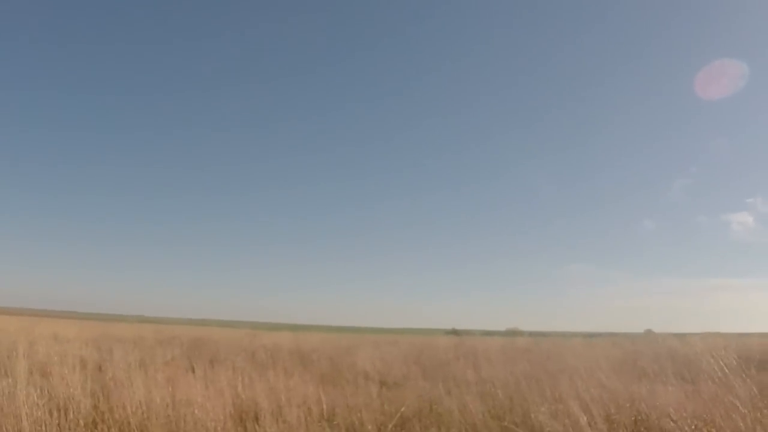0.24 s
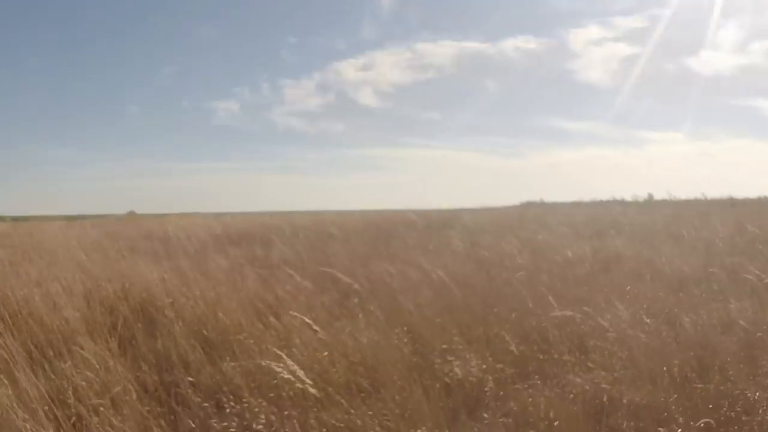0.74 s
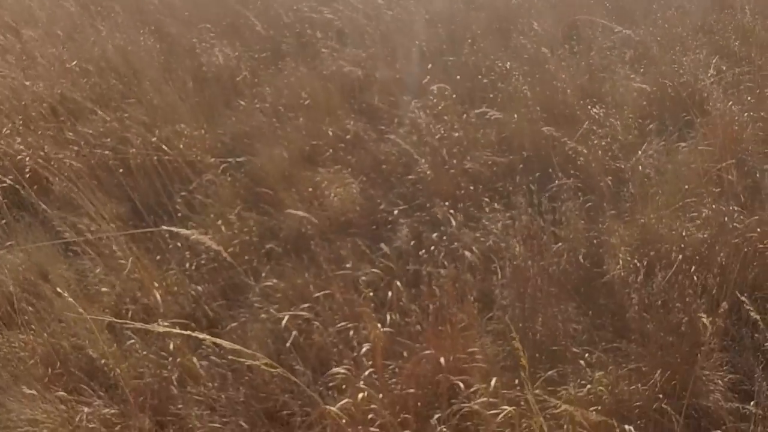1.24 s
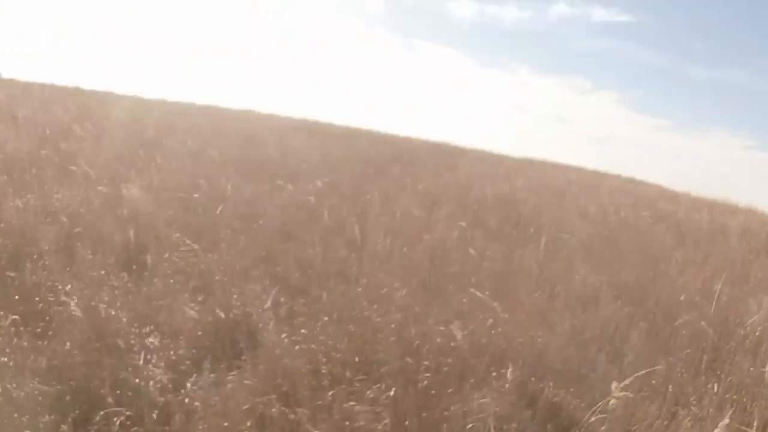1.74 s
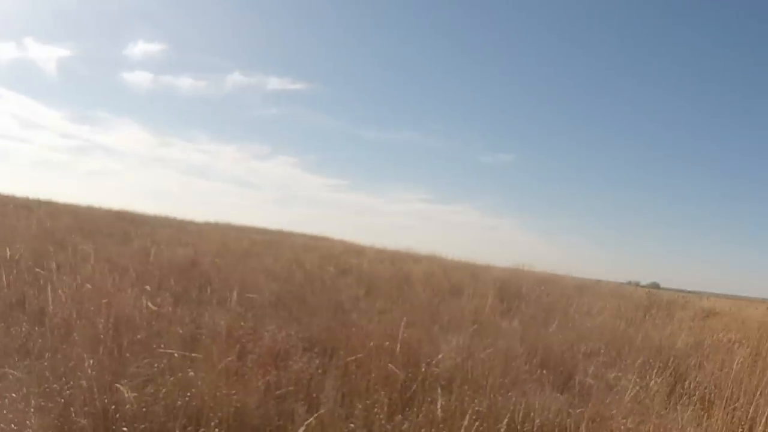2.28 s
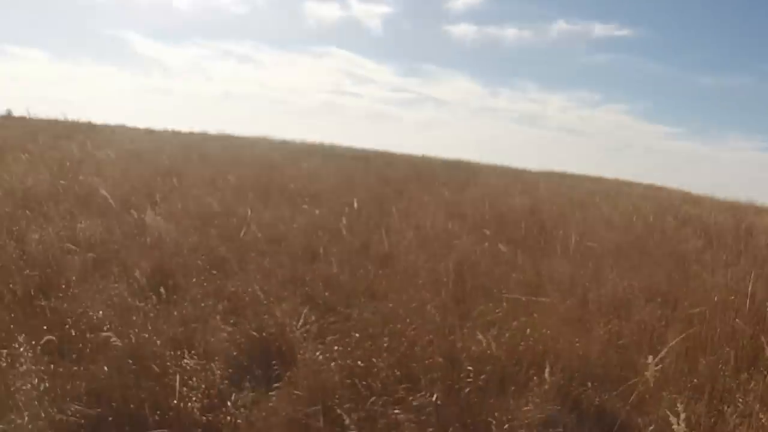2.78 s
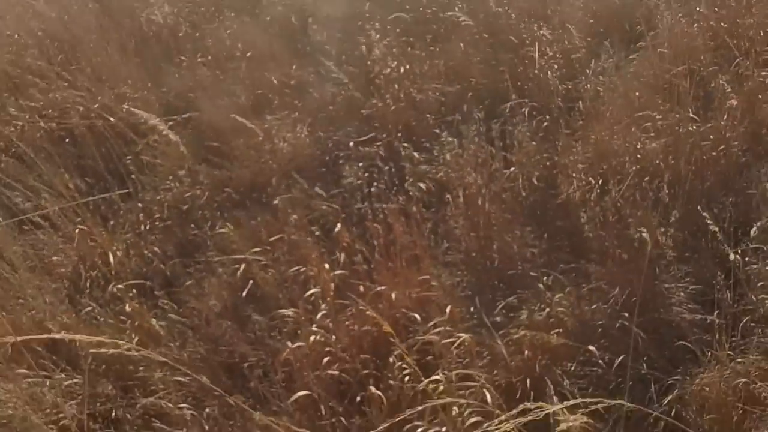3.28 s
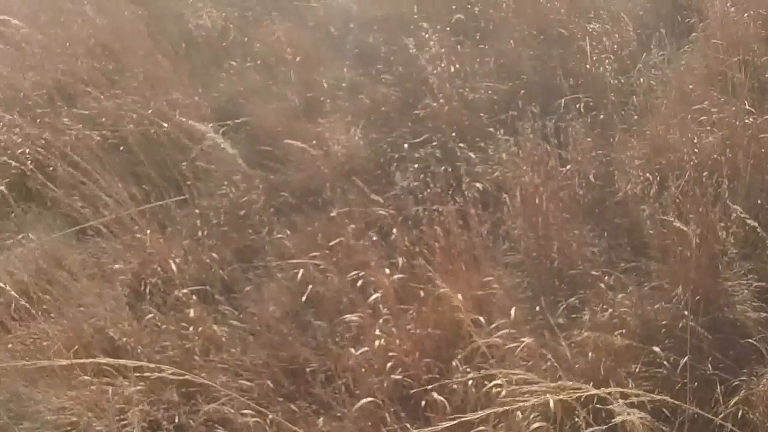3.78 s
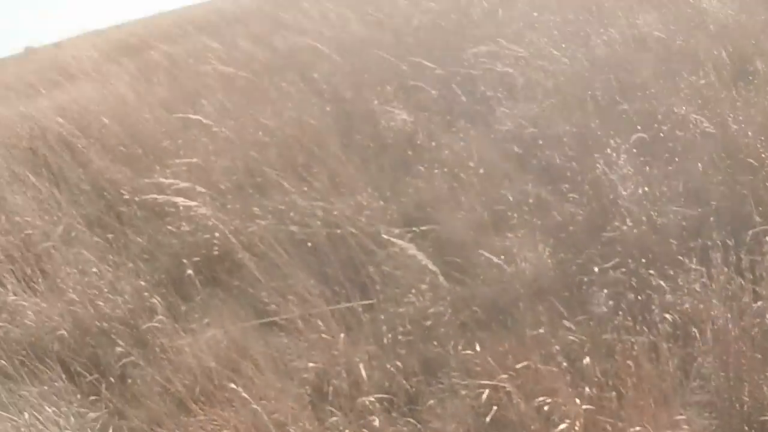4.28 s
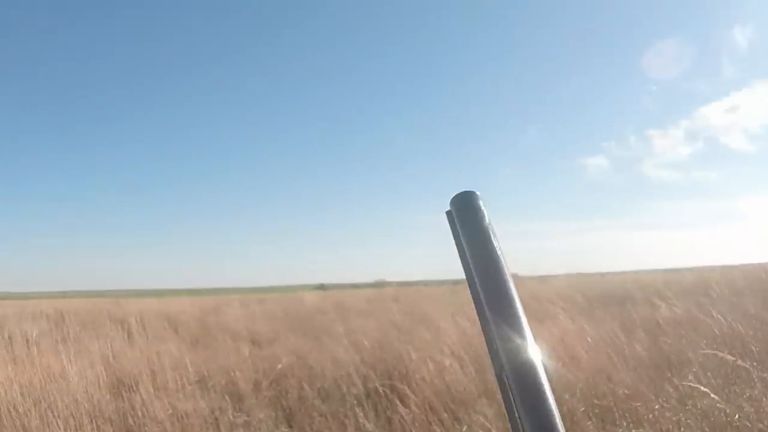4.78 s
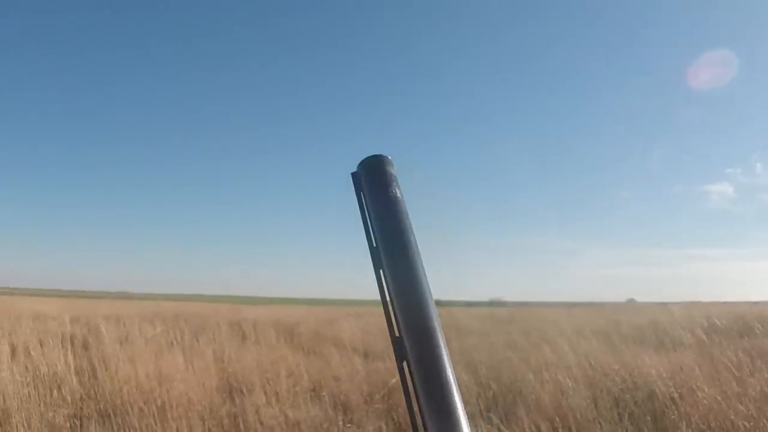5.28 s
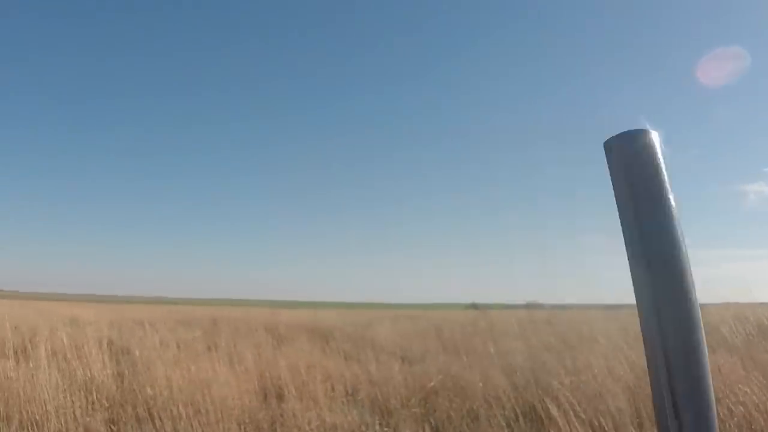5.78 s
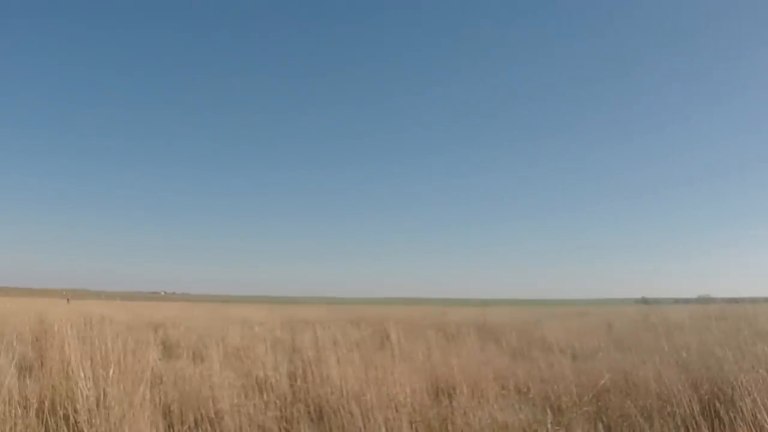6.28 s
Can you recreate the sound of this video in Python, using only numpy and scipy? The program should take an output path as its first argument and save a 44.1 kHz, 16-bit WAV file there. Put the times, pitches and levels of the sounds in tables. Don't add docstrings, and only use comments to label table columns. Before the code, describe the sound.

Someone shifts through tall dry grass carrying a barrel. Gusts rumble on the microphone port, stalks swish and crunch, and cloth drags hollowly on the housing. A loose metal swivel ticks and chirps as the barrel is lowered, falls nearly quiet, then rattles and knocks as it rises. Strong wind buffets follow, with boxy rustling to the end. No echo.

```python
import sys
import numpy as np
from scipy import signal
from scipy.fft import rfft, irfft
from scipy.io import wavfile
from scipy.ndimage import uniform_filter1d

SR = 44100
rng = np.random.default_rng(int(sys.argv[2]) if len(sys.argv) > 2 else 0)


def decibels_to_gain(level_db):
    exponent = np.asarray(level_db, float) / 20
    return 10 ** exponent


def inscribe(sig):
    pcm = np.round(np.clip(np.atleast_2d(sig).T, -1, 1) * 32767)
    wavfile.write(sys.argv[1], SR, pcm.astype(np.int16))


N = 288344

# (t/s, level/dB)
BREEZE = [(0, -62.5), (.6, -53), (1.1, -57.5), (1.4, -64), (2, -55.5), (2.8, -52.5), (3.2, -55.5),
          (3.5, -57), (4.1, -62.5), (4.5, -66), (4.8, -60), (5.1, -51), (5.6, -52), (6.06, -56),
          (6.54, -59)]


def evened(x):
    return x / np.sqrt(np.mean(x ** 2) + 1e-20)


def read(points, hz):
    f, value = np.transpose(points)
    return np.interp(np.log(hz + 1), np.log(f + 1), value)


def add(mix, s, sound):
    part = mix[round(s * SR):][:len(sound)]
    part += sound[:len(part)]


def resonate(x, hz, width):
    r = np.exp(-np.pi * width / SR)
    feedback = [1, -2 * r * np.cos(2 * np.pi * hz / SR), r * r]
    return signal.lfilter([(1 - r * r) / 2, 0, (r * r - 1) / 2], feedback, x)


def rings(x, modes):
    total = 0
    for hz, width, db in modes:
        mode = resonate(resonate(x, hz, width), hz, 4 * width)
        total = total + decibels_to_gain(db) * evened(mode)
    return total


def coloured(x, db_of, size):
    hz, t, z = signal.stft(x, SR, nperseg=size, noverlap=size * 3 // 4)
    gain = decibels_to_gain(db_of(hz[:, None], t[None]))
    gain = gain / np.sqrt((gain ** 2).mean(axis=0))
    return signal.istft(z * gain, SR, nperseg=size, noverlap=size * 3 // 4)[1][:len(x)]


def shaped(points):
    spectrum = rfft(rng.standard_normal(N)) * decibels_to_gain(read(points, np.fft.rfftfreq(N, 1 / SR)))
    return evened(irfft(spectrum, N))


def lumps(per_s):
    span = int(SR / per_s)
    return evened(uniform_filter1d(uniform_filter1d(rng.standard_normal(N), span), span))


def crackle(count, per_s, spread_db, smooth):
    chance, size = rng.random(count), rng.exponential(1, count)
    noise, sign = rng.standard_normal((2, count))
    snaps = (chance < per_s / SR) * decibels_to_gain(spread_db * np.minimum(size, 4)) * sign
    share = np.clip(smooth, 0, 1)
    return np.sqrt(share) * noise + np.sqrt(1 - share) * evened(snaps)


def steadied(x, share):
    return evened(x / (abs(signal.hilbert(x)) + 0.15) ** share)


def levelled(x, span_s):
    return evened(x / np.sqrt(abs(uniform_filter1d(x ** 2, int(span_s * SR))) + .05))


def swells(rows, t, pointed):
    edge_db = -10.5
    s, length, level_db = np.transpose(rows)[:3, :, None]
    return decibels_to_gain(level_db + edge_db * abs(2 * (t - s) / length) ** pointed) ** 2


def spread(power, t):
    return np.interp(np.arange(N) / SR, t, np.sqrt(power))


def hiss():
    # (f/Hz, level/dB per Hz)
    hiss_colour = [(88, -15.5), (150, -3.5), (235, -3.5), (383, -6.5), (504, -9), (566, -9), (624, -10),
                   (3700, -22), (4080, -21.5), (5300, -22.5), (5790, -22), (6500, -25.5), (8400, -29.5),
                   (9100, -29), (12900, -35), (14800, -38), (16000, -51)]
    return decibels_to_gain(-59.5) * shaped(hiss_colour)


def wind():
    # (f/Hz, level/dB per Hz)
    buffet_colour = [(7, -20.5), (12, -8), (25, 0), (38, -2.5), (58, -6), (72, -13.5), (88, -25),
                     (200, -78)]
    # (f/Hz, level/dB per Hz)
    flutter_colour = [(40, -26), (65, -1), (115, 1.5), (150, -3.5), (190, -12), (300, -17), (500, -32.5),
                      (1000, -59.5)]
    # (peak t/s, length/s, buffeting/dB, flutter against buffeting/dB)
    gust_rows = [(0.001, 0.14, -41.5, -4), (.16, 0.15, -48.5, -5.5), (0.325, 0.15, -44, -6),
                 (0.545, 0.12, -53, 3), (0.707, 0.21, -51, 5.5), (.87, 0.26, -42.5, -8.5),
                 (1.17, 0.072, -41.5, -13), (1.505, 0.58, -50.5, 1.5), (1.5, .1, -54, 5),
                 (1.74, 0.24, -43.5, -1), (1.98, 0.19, -44, -3.5), (2.18, 0.18, -50.5, -2),
                 (2.303, 0.14, -42, -8.5), (2.39, 0.14, -44, -5), (2.63, 0.21, -44.5, 0),
                 (3.014, 0.32, -49, -8), (3.084, 0.085, -39.5, -25), (3.248, .12, -56.5, 4),
                 (4.312, .2, -53, -12), (4.556, 0.52, -54.5, -19), (4.8, 0.17, -44, -30),
                 (4.891, 0.085, -33, -21), (4.992, 0.064, -35, -9), (5.21, .08, -46, 0),
                 (5.296, 0.43, -41, -6), (5.721, 0.053, -50.5, 7.5), (5.783, .2, -42.5, -2),
                 (5.88, .1, -52, 4), (5.97, 0.17, -45, 0), (6.179, 0.19, -41, -1.5), (6.285, 0.16, -47, 6),
                 (6.436, 0.16, -40, -3)]
    t = np.arange(0, N / SR, .002)
    breeze = decibels_to_gain(np.interp(t, *np.transpose(BREEZE))) ** 2
    gusts = swells(gust_rows, t, pointed=1.47)
    buffet_power = breeze + gusts.sum(axis=0)
    flutter_power = breeze * decibels_to_gain(1) ** 2 + decibels_to_gain(np.transpose(gust_rows)[3]) ** 2 @ gusts
    buffet = steadied(shaped(buffet_colour), share=0.23)
    flutter = levelled(evened(shaped(flutter_colour) * decibels_to_gain(.9 * lumps(25.0))), span_s=.09)
    return buffet * spread(buffet_power, t) + flutter * spread(flutter_power, t)


def drag(s, length, level_db, hz):
    drive = crackle(count=11000, per_s=1400, spread_db=3.5, smooth=0.75)
    low_ring = evened(resonate(resonate(drive, hz, 400), hz, 400))[:int(length * SR)]
    return s, decibels_to_gain(level_db) * low_ring * signal.windows.tukey(len(low_ring), .9)


def tilt_db(hz, tilt):
    return tilt * np.log2(np.clip(hz, 400, 7000) / 2000)


def grass_db(hz, tilt):
    # (f/Hz, level/dB per Hz)
    grass_colour = [(250, -5.5), (500, -7), (1000, -5.5), (1400, -7.5), (2800, -10), (3200, -16.5),
                    (5000, -20), (7000, -37), (12000, -62)]
    # (f/Hz, width/Hz, level/dB)
    housing = [(1610, 290, 6.5), (1950, 280, -1), (2220, 190, 6), (2580, 120, 3), (3560, 260, 7),
               (4400, 400, 2)]
    peaks = sum(db / (1 + (2 * (hz - f) / width) ** 2) for f, width, db in housing)
    return read(grass_colour, hz) + peaks + tilt_db(hz, tilt)


def brush():
    # (peak t/s, length/s, level/dB, hollow ring of the housing/dB)
    sweep_rows = [(0.001, 0.38, -54.5, -5), (0.323, 0.22, -61, -3), (.55, 0.13, -64, 0),
                  (0.69, 0.18, -56.5, -1.5), (0.832, 0.18, -57.5, -3), (1.327, 0.34, -62.5, -2),
                  (1.464, 0.075, -59.5, 1), (1.562, 0.18, -61, 9), (1.71, 0.29, -58, 3),
                  (1.984, .2, -59.5, 2), (2.215, 0.22, -60, -8), (2.348, .15, -52.5, 10),
                  (2.55, 0.18, -61, 2), (2.644, .3, -56.5, 10), (3.038, 0.24, -61.5, -2),
                  (3.2, 0.078, -62.5, 10), (3.36, 0.089, -73, 5), (3.838, 0.089, -69, -5),
                  (4.34, .2, -64, 0), (4.498, 0.18, -69, 6), (4.68, 0.14, -79, -3), (4.9, 0.5, -61, -3),
                  (5.004, 0.066, -50.5, 10), (5.135, 0.036, -54, 18), (5.196, 0.072, -62, 8),
                  (5.31, 0.37, -54.5, 2), (5.708, 0.096, -55, 3), (5.813, 0.2, -53.5, -6),
                  (5.95, .12, -60, 2), (6.04, .12, -55, 6), (6.17, 0.32, -52, 3.5), (6.3, .06, -55, 4),
                  (6.385, .08, -58, 6), (6.487, 0.24, -54, 4)]
    stir_db, clump_db = -19, 1.7
    hollow_hz, hollow_width_hz = 1586, 104
    s = np.arange(0, N / SR, .002)
    sweeps = swells(sweep_rows, s, pointed=1.34)
    power = decibels_to_gain(np.interp(s, *np.transpose(BREEZE)) + stir_db) ** 2 + sweeps.sum(axis=0)
    hollow_db = np.transpose(sweep_rows)[3] @ sweeps / power
    tilt = -1.28 + 0.07 * (10 * np.log10(power) + 63) + 0.24 * hollow_db

    def colour(hz, t):
        hollow = 1 / (1 + (2 * (hz - hollow_hz) / hollow_width_hz) ** 2)
        return grass_db(hz, np.interp(t, s, tilt)) + hollow * np.interp(t, s, hollow_db)

    drive = crackle(count=N, per_s=3000, spread_db=3.0, smooth=0.94) * decibels_to_gain(clump_db * lumps(49))
    return coloured(evened(drive), colour, size=512) * spread(power, s) * decibels_to_gain(2.0)


def crunch(s, peak_db, tilt, t60, hold):
    # (f/Hz, level/dB per Hz)
    crushed_colour = [(240, -60), (400, -13), (1100, -9.5), (1230, -18), (1490, -2.5), (1650, -1),
                      (2530, -8), (2750, -10.5), (3580, -7.5), (4400, -14), (4790, -9.5), (5580, -29.5),
                      (6320, -19), (7160, -41), (11000, -45), (14300, -73), (22000, -120)]
    t = np.arange(-400, 9000) / SR
    shape = np.clip(t / 0.0036, 0, 1) * decibels_to_gain(-60 * np.maximum(t - hold, 0) / max(t60, .03))
    drive = evened(crackle(count=len(t), per_s=4300, spread_db=2.5, smooth=.7)) * shape
    colour = lambda hz, t: read(crushed_colour, hz) + tilt_db(hz, tilt) + 0 * t
    return s + t[0], decibels_to_gain(peak_db - 10.0) * coloured(drive, colour, size=256)


def ring(s, length, level_db, hz, rough):
    count, share = int(length * SR), np.clip(rough, 0, 1)
    noise = resonate(resonate(rng.standard_normal(2400), hz, 300), hz, 600)
    noise = evened(noise[800:][:count])
    tone = np.sqrt(2) * np.sin(2 * np.pi * hz * np.arange(count) / SR)
    blend = np.sqrt(1 - share) * tone + np.sqrt(share) * noise
    return s, decibels_to_gain(level_db) * blend * signal.windows.tukey(count, .8)


def squeak(s, length, level_db, hz, others_db):
    # (f/Hz, width/Hz, level/dB)
    rubbed = [(1620, 240, -12), (2900, 90, -11), (3600, 270, -7), (6470, 300, -15), (9300, 500, -9),
              (7650, 3700, -6), (12500, 2500, -18)]
    count = int(length * SR)
    rub, waver = rng.standard_normal((2, 1600))[:, :count]
    pitch = hz * (1 + .004 * evened(uniform_filter1d(waver, 200)))
    tone = np.sqrt(2) * np.sin(2 * np.pi * np.cumsum(pitch) / SR)
    smear = decibels_to_gain(-7.0 + 0.73 * (others_db + 4.5)) * evened(resonate(rub, hz, 160))
    overtones = evened(resonate(rub, 2 * hz, 400) + 0.24 * resonate(rub, 3 * hz, 500))
    overtones_db = -19.5 + 0.23 * (others_db + 13)
    others = decibels_to_gain(others_db) * evened(rings(rub, rubbed))
    scrape = 0.12 * resonate(rub, 5300, 9000)
    sound = tone + smear + decibels_to_gain(overtones_db) * overtones + others + scrape
    return s, decibels_to_gain(level_db) * sound * signal.windows.tukey(count, .85)


def tick(s, peak_db, hz, dull_db, upper_db, facing_db, upper):
    # (f/Hz, width/Hz, level/dB)
    metal = [(2660, 290, 0), (3740, 300, -0.5), (4600, 250, 1), (5000, 410, -11)]
    # (f/Hz, width/Hz, level/dB)
    dull = [(1540, 500, 20), (2140, 310, -4)]
    # (f/Hz, width/Hz, level/dB)
    bright = [(9360, 800, 8.5), (10740, 2900, 6), (12300, 2000, -5), (15000, 680, -6)]
    t = np.arange(2000) / SR
    t60 = 0.012 + 0.00034 * (peak_db + 32.5)
    rise = 0.001 * decibels_to_gain(0.69 * (peak_db + 29.0))
    rattle = 0.081 * np.exp(-t / 0.011)
    onset = np.sin(np.pi / 2 * np.clip(t / rise, 0, 1)) ** 2
    force = onset * (decibels_to_gain(-60 * np.maximum(t - rise, 0) / t60) + rattle)
    contact = np.sign(rng.standard_normal(len(t))) * force
    late_contact = contact * np.clip(t / .0015, .1, 1)
    body = rings(contact, metal + [(hz, max(300, 0.076 * hz), 5.5), (3600, 1800, 1)])
    parts = body, rings(contact, dull), rings(contact, upper), rings(late_contact, bright)
    bright_db = facing_db + 0.27 * (upper_db + 13.0) + 0.38 * (peak_db + 36.5)
    levels_db = peak_db + np.array([-6.3, dull_db + 2, upper_db - 5.5, bright_db])
    sound = sum(decibels_to_gain(db) * evened(part) for part, db in zip(parts, levels_db))
    sound = sound * np.sqrt(np.mean(force ** 2)) / force.max()
    high_pass = signal.butter(6, 1300, "high", fs=SR, output="sos")
    return s - .0008, signal.sosfilt(high_pass, sound)


def scene():
    # (t/s, length/s, level/dB, f/Hz)
    drags = [(0.769, 0.052, -55.5, 1560), (0.826, 0.053, -54, 1610), (1.25, 0.11, -62, 1580),
             (1.927, 0.078, -59.5, 1590), (2.568, 0.043, -61, 1560), (2.978, 0.071, -59, 1650),
             (3.041, .05, -55, 1560), (2.719, 0.056, -59, 2160), (5.247, 0.082, -56.5, 2350),
             (6.029, 0.26, -60, 2410), (6.07, 0.059, -72, 1560), (6.422, 0.11, -58, 1540)]
    # (t/s, peak/dB, brightness/dB per octave, t60/s, hold/s)
    crunches = [(0.13, -44.5, 6, 0.091, 0.0085), (0.626, -43.5, 6, 0.12, 0.011),
                (0.9796, -33, 0.5, 0.14, 0.018), (1.454, -42.5, 0, 0.12, 0.013),
                (1.538, -57, 13, 0.12, 0.012), (1.7513, -29.5, -1, 0.1, 0.0065),
                (1.7695, -44, 0, 0.3, 0.015), (1.938, -45.5, -5, 0.067, 0.0079),
                (1.971, -45, -1, 0.06, 0.0089), (3.176, -45.5, -0.5, 0.16, 0.011),
                (3.831, -49, 2, 0.17, 0.013)]
    # (t/s, length/s, level/dB, f/Hz,
    # roughness 0-1)
    short_rings = [(2.274, .021, -56, 9300, .6), (2.305, 0.027, -46, 9280, .3),
                   (2.303, 0.026, -54, 6540, .15), (2.286, .024, -55, 1600, .3),
                   (2.314, .018, -57, 1580, .3), (2.333, .009, -56, 1640, .4), (2.282, .022, -60, 3630, .5),
                   (2.316, 0.014, -60, 3630, .5), (2.329, .012, -60, 9200, .6), (2.351, .016, -52, 9500, .8),
                   (2.352, .018, -58, 14900, .5), (2.344, .007, -41.5, 1270, .2),
                   (2.3445, 0.0058, -43, 1820, 0.35), (2.3455, 0.0055, -44, 7570, .4),
                   (2.3455, .005, -45, 11000, .4), (2.2345, .006, -58, 7600, .5),
                   (2.546, 0.0064, -42.5, 1540, 0.1), (4.8435, 0.0098, -34, 3510, .15),
                   (4.845, 0.0071, -45, 1600, 0.4), (4.843, 0.0064, -45, 2600, .3),
                   (.9735, .005, -56, 2200, .3), (1.771, .008, -48, 1600, .3), (1.824, .009, -59, 7650, .4),
                   (4.802, .011, -55, 4700, .4), (4.836, .007, -54, 4700, .9), (4.6935, .008, -49, 3600, .3),
                   (4.7055, .005, -58, 13200, .4), (5.033, .007, -52, 4950, .3),
                   (4.386, .004, -56, 9300, .5), (4.398, .005, -47, 9500, .6),
                   (2.5435, .004, -50, 11000, .5), (5.075, .008, -39, 2610, .25),
                   (5.075, .004, -52, 11000, .6), (4.398, .006, -46, 2150, .3),
                   (4.3985, .006, -44, 4000, .5), (4.842, .007, -38, 4570, .3), (4.843, .008, -47, 7150, .5),
                   (5.0425, .007, -50, 2400, .4), (4.7765, .005, -47, 5300, .5),
                   (4.7765, .005, -50, 9400, .5)]
    # (t/s, length/s, level/dB, pitch f/Hz, other rings/dB)
    squeaks = [(1.797, 0.011, -57, 4680, -25), (1.8227, 0.008, -44, 5120, -14),
               (2.27, 0.032, -47, 4690, -4.5), (2.297, 0.022, -42.5, 4880, -3),
               (2.3155, 0.013, -47, 4800, 0), (2.32, 0.007, -54, 4680, -10), (2.327, 0.02, -53, 4820, -3),
               (2.352, 0.007, -33, 4930, -14), (2.357, 0.0072, -32, 4950, -19),
               (2.36, 0.011, -37, 4935, -25), (2.368, 0.0097, -53, 5000, -24),
               (4.369, .007, -55, 4600, -12), (4.395, 0.014, -54, 4950, -13),
               (4.808, 0.014, -46, 5020, -12), (4.838, 0.0059, -50, 5030, -13)]
    # (t/s, peak/dB, main ring f/Hz, dull part/dB, upper part/dB)
    lowered_ticks = [(1.5473, -42.5, 3600, -19, -30), (1.798, -35, 4740, -13, -34),
                     (1.825, -37.5, 12900, -8, -16), (2.1073, -44, 4680, -9, -21),
                     (2.2122, -36, 3560, -10, -6), (2.2175, -42.5, 3560, -1, -12),
                     (2.223, -29.5, 3470, -25, -34), (2.2295, -34.5, 7600, -13, -16),
                     (2.249, -32, 4800, -11.5, -21), (2.2614, -38, 2610, -17, -11),
                     (2.2707, -39.5, 4620, -5, -15), (2.3444, -24.5, 4600, -16, -14),
                     (2.346, -30.5, 4500, -14, -4), (2.513, -35.5, 3520, -19, -17),
                     (2.5436, -37, 13000, -25, -7), (2.544, -30.5, 4460, -30, -12),
                     (2.547, -33, 3440, -3.5, -24), (2.6397, -57, 2440, 8, -26)]
    # (t/s, peak/dB, main ring
    # f/Hz, dull part/dB, upper part/dB)
    turned_ticks = [(4.3864, -34.5, 4800, -27, -22), (4.392, -38, 4960, -12, -16),
                    (4.3979, -25.5, 4760, -48, -22), (4.3994, -39, 2160, -16, -25),
                    (4.412, -42, 4000, -22, -20), (4.509, -41.5, 2520, -28, -22),
                    (4.6402, -46, 2580, -22, -24), (4.6932, -31, 5720, -32, -8),
                    (4.703, -32.5, 3300, -41, -24), (4.7073, -38.5, 4990, -11, -16),
                    (4.714, -38, 3210, -21, -7), (4.764, -32, 2040, -20, -9), (4.777, -30, 3100, -38, -7),
                    (4.8115, -42, 5100, -24, -12), (4.8353, -37, 5200, -31, -8),
                    (4.817, -37, 3600, -27, -10), (4.8419, -22, 4600, -30, -16),
                    (4.8434, -22.5, 2950, -24, -11), (4.85, -47, 3500, -13, -10),
                    (5.034, -36, 5000, -22, -20), (5.043, -31, 4050, -24, -13),
                    (5.044, -34.5, 5400, -12, -11), (5.0747, -47, 4400, -7, -4),
                    (5.0753, -31, 5200, -19.5, -17),
                    (4.785, -48, 4000, -25, -12), (4.789, -43, 5200, -25, -12),
                   (4.7935, -50, 5800, -25, -12), (4.8225, -42, 4200, -25, -14),
                   (4.826, -44, 5000, -25, -14), (2.5205, -50, 3600, -20, -14),
                   (2.3468, -25, 5000, -20, -9), (1.7765, -46, 4600, -12, -25),
                   (5.0475, -39, 5800, -18, -12), (5.0555, -50, 6200, -10, -10),
                   (5.0783, -33, 3500, -20, -16), (4.4022, -35, 4700, -30, -22),
                   (4.7772, -38, 2200, -20, -20), (.63, -50, 3600, -14, -25), (1.939, -50, 2300, -6, -28),
                   (5.235, -52, 2800, -20, -28)]
    # (f/Hz, width/Hz, level/dB)
    lowered_upper = [(5670, 890, -1), (7500, 400, 17), (6860, 300, 7)]
    # (f/Hz, width/Hz, level/dB)
    turned_upper = [(5560, 700, 1), (7050, 600, 14)]
    ticks = [(*row, -14.5, lowered_upper) for row in lowered_ticks]
    ticks += [(*row, -23, turned_upper) for row in turned_ticks]
    mix = hiss() + wind() + brush()
    events = (drag, drags), (crunch, crunches), (ring, short_rings), (squeak, squeaks), (tick, ticks)
    for source, rows in events:
        for row in rows:
            add(mix, *source(*row))
    return np.array([mix, mix])


def band_limit(x):
    return signal.sosfilt(signal.butter(12, 16500, fs=SR, output="sos"), x)


def record(dry):
    # (f/Hz, gain/dB)
    treble_end = [(9000, -0.5), (15000, -2), (15350, -10), (15500, -24), (16500, -13), (16700, -70)]
    # (f/Hz, level/dB)
    difference = [(30, -33), (130, -23), (1000, -21.5), (6000, -15), (13000, -11)]
    hz, t, z = signal.stft(dry[0], SR, nperseg=2048)
    z = z * decibels_to_gain(read(treble_end, hz))[:, None]
    band = (6 * np.log2(1 + hz / 700)).astype(int)
    often = np.where(rng.random(len(t)) < .22, .7, .07)
    patches = (rng.random((band.max() + 1, len(t))) < often)[band]
    scramble = np.exp(2j * np.pi * rng.random(z.shape))
    trace = abs(z) * decibels_to_gain(read(difference, hz))[:, None] * patches * scramble
    both = signal.istft(np.array([z + trace, z - trace]), SR, nperseg=2048)[1][:, :N]
    return band_limit(both)


dry = scene()
out = record(dry)
inscribe(out)
```